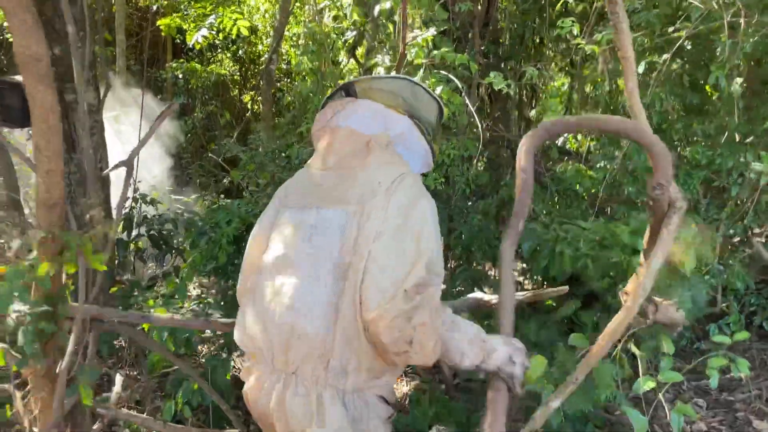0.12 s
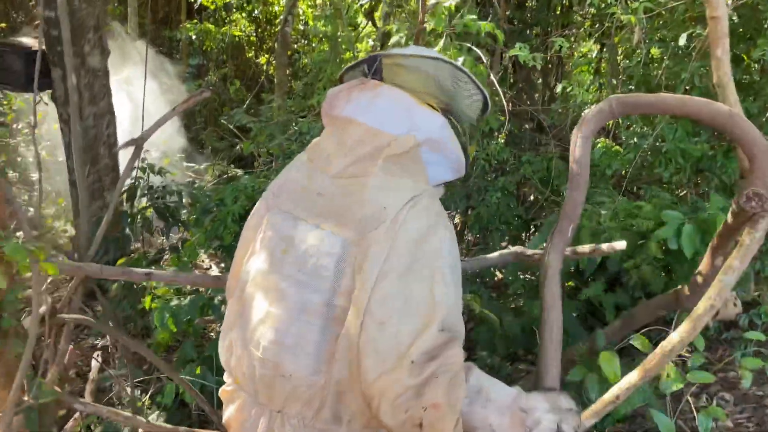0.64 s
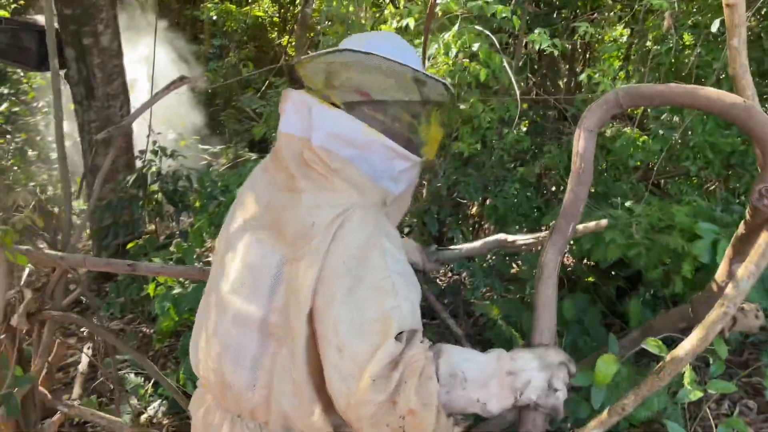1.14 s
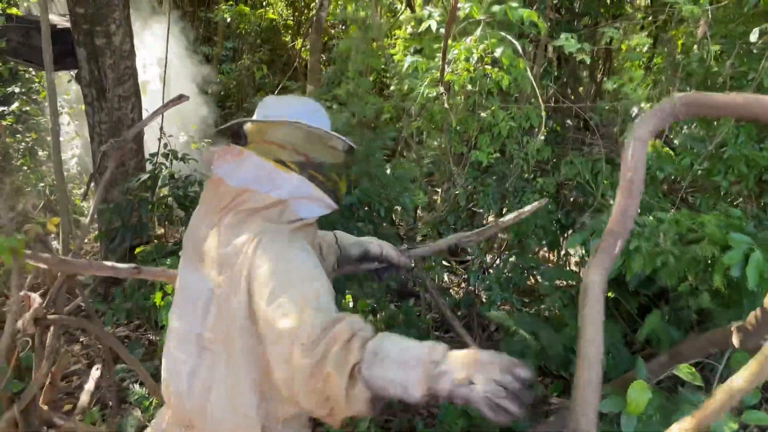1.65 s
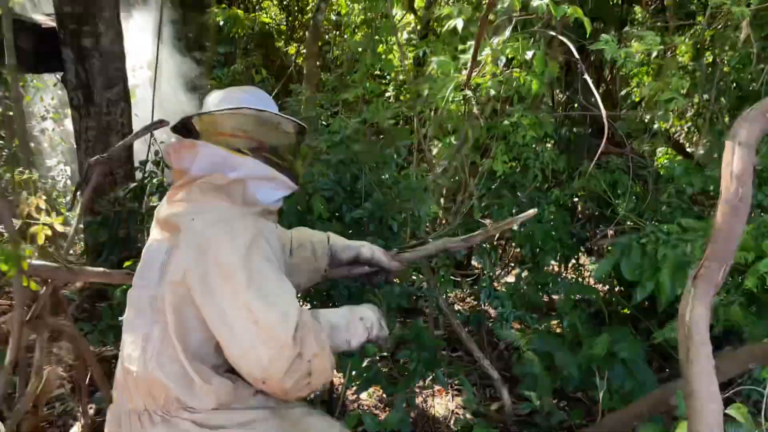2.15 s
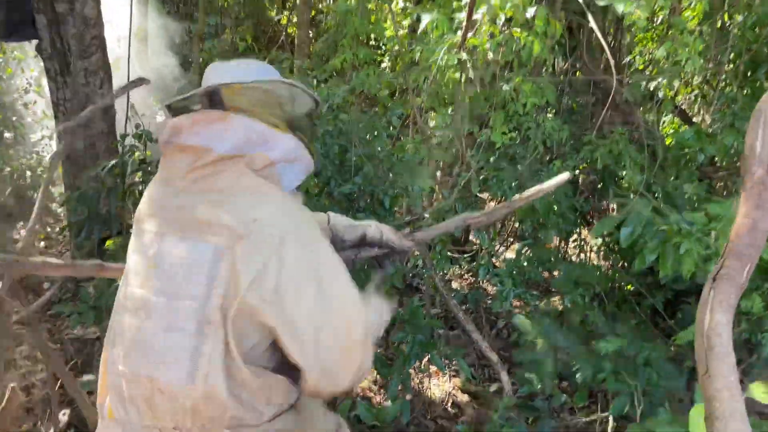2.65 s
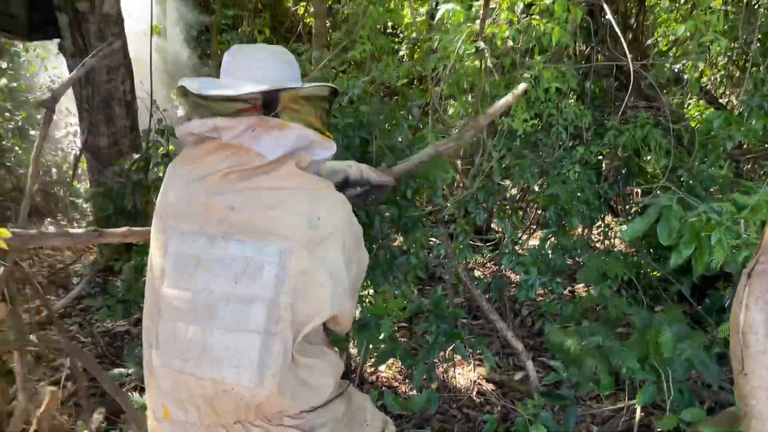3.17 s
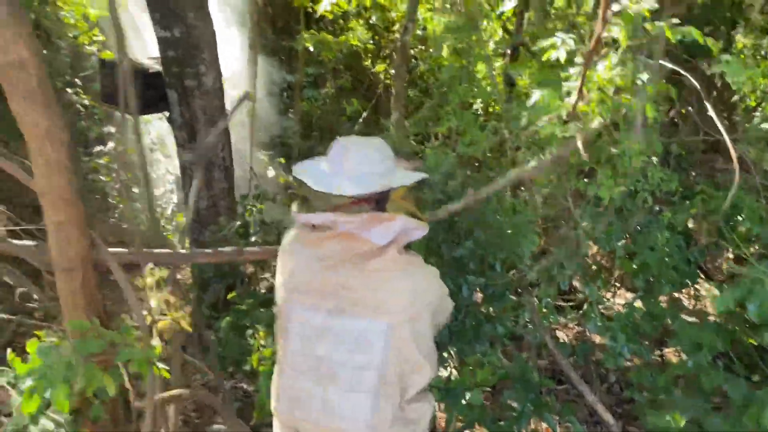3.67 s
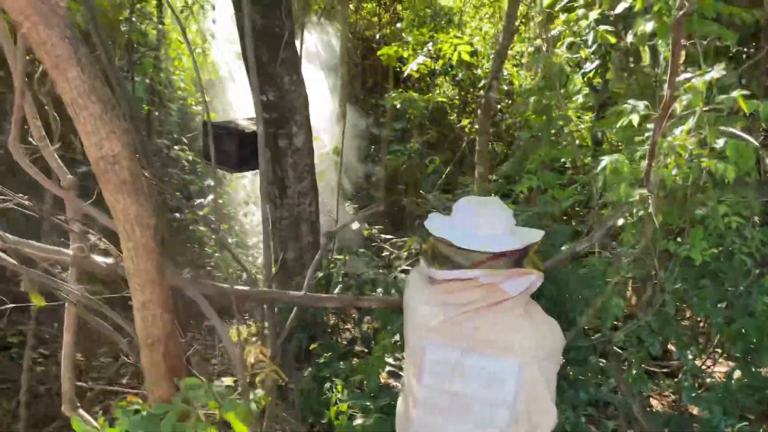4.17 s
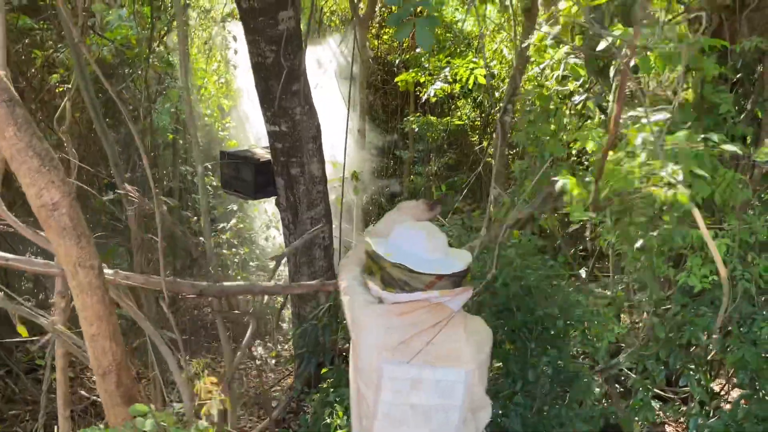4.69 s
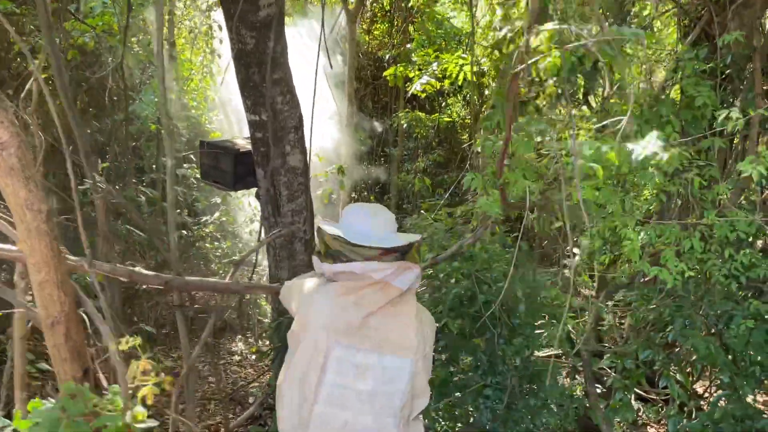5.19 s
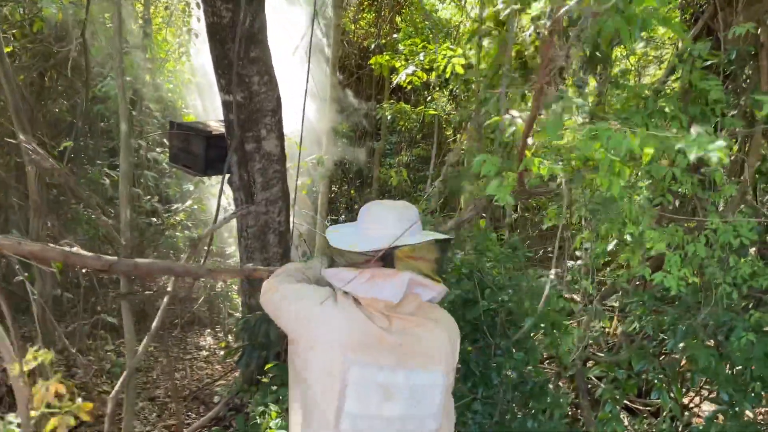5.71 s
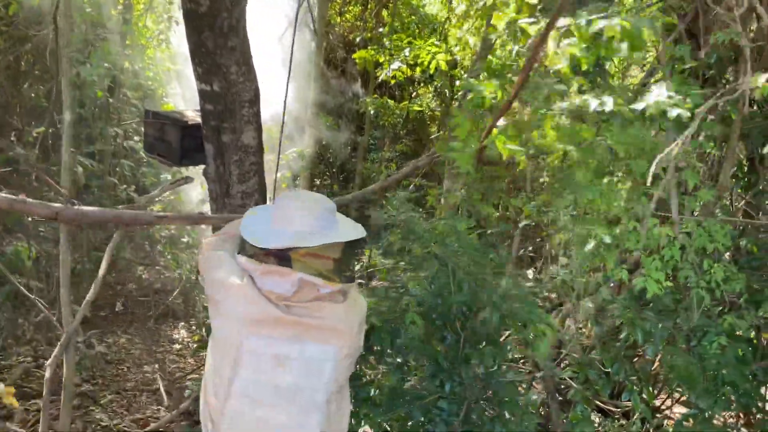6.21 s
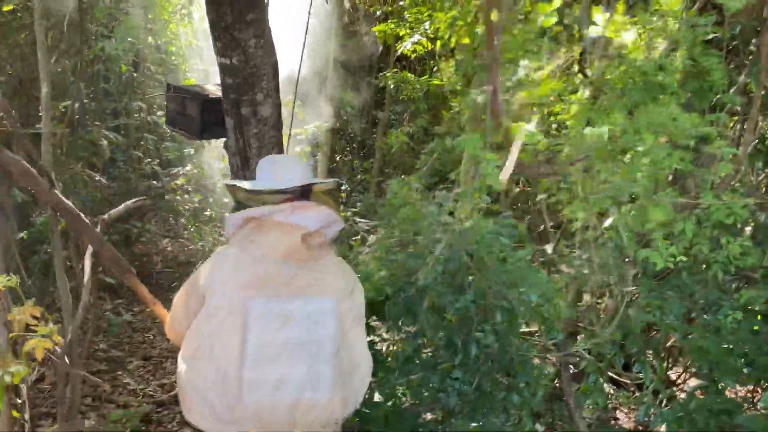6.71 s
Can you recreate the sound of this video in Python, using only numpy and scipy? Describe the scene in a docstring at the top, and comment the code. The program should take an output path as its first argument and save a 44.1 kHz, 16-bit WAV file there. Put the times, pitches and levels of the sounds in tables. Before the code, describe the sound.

Someone pushes through dry brush close by, leaves rustling in swells while twigs snap sharply and branches knock over a faint outdoor hush.

```python
"""Leaves rustle in clumps of tiny clicks as someone pushes through dry brush, close by and in stereo.
Each click excites a short ring of its own pitch, and the pushes swell and fade the rustle.
Twigs snap as bursts of cracks ringing a narrow band, branches knock in damped modes, and stems scrape as
dense catches in a broad band. Feet press the litter as low rustle. A faint hush and a low rumble,
both of filtered noise, lie below."""
import sys
import numpy as np
from scipy import signal
from scipy.fft import rfft, irfft, next_fast_len
from scipy.io import wavfile
from scipy.ndimage import uniform_filter1d

SR = 44100
rng = np.random.default_rng(int(sys.argv[2]) if len(sys.argv) > 2 else 0)


def volts_from_decibels(level):
    """Turn decibel levels (scalar or array-like) into linear amplitude factors."""
    exponent = np.asarray(level, float) / 20
    return 10 ** exponent


def generate_wav(signal):
    """Clip the signal to [-1, 1] and save it as 16-bit WAV at the path in sys.argv[1]."""
    frames = np.transpose(np.atleast_2d(signal))
    scaled = np.clip(frames, -1, 1) * 32767
    pcm = np.round(scaled).astype(np.int16)
    wavfile.write(sys.argv[1], SR, pcm)


N = 301682   # samples

# spectral colour of dry leaves and of the spray of a snap: frequency_hz, gain_db
LEAF_COLOUR = [(100, -4), (260, 0), (450, -5), (950, -1), (1600, 2), (2500, 1), (4200, 1.5), (5500, 0),
               (8000, -5), (9400, -3), (11000, -7), (13100, -14), (15600, -8)]


def rms_one(x):
    """Normalisation: scales a signal to unit root mean square."""
    return x / np.sqrt(np.mean(x ** 2) + 1e-20)


def coloured(x, points):
    """Linear filtering: gain by frequency, drawn through (hz, db) points on a log frequency axis."""
    size = next_fast_len(x.shape[-1])
    hz, db = np.transpose(points)
    log_hz = np.log(np.arange(size // 2 + 1) * SR / size + 1)
    gain = volts_from_decibels(np.interp(log_hz, np.log(hz), db))
    return irfft(rfft(x, size) * gain, size)[..., :x.shape[-1]]


def band(x, low, high, order=1):
    """Band-pass resonance: passes what lies between two frequencies in Hz."""
    sos = signal.butter(order, [low, min(high, .45 * SR)], "band", fs=SR, output="sos")
    return signal.sosfilt(sos, x)


def drift(rate_hz):
    """Low-passed noise: a slow random signal of unit rms, from two equal poles at rate_hz."""
    pole = np.exp(-80 * np.pi * rate_hz / SR)   # one step is 40 samples
    noise = rng.standard_normal(N // 40 + 2002)
    slow = signal.lfilter([1], [1, -2 * pole, pole * pole], noise)[2000:]
    return np.interp(np.arange(N) / 40, np.arange(len(slow)), rms_one(slow))


def ring(clicks, hz, t60_s):
    """Damped resonator: a unit click sets a sine ringing, which falls by 60 dB in t60_s."""
    radius, turn = 1000 ** (-1 / (t60_s * SR)), 2 * np.pi * hz / SR
    poles = [1, -2 * radius * np.cos(turn), radius * radius]
    return signal.lfilter([0, np.sin(turn)], poles, clicks + 1e-18)


def swells(start_s, peak_db, swell_s, fade_s):
    """Exponential growth and decay: one envelope a row about its peak, at every 64th sample."""
    since_s = np.arange(0, N + 64, 64)[None] / SR - np.reshape(start_s, (-1, 1))
    rise_s = np.maximum(np.reshape(swell_s, (-1, 1)), .005)
    fall_s = np.maximum(np.reshape(fade_s, (-1, 1)), .005)
    spans_s = np.where(since_s < 0, -rise_s, fall_s)
    return volts_from_decibels(peak_db)[:, None] * np.exp(-since_s / spans_s)


def every_sample(envelope):
    """Linear interpolation: an envelope at every 64th sample becomes one at every sample."""
    return np.interp(np.arange(N) / 64, np.arange(len(envelope)), envelope)


def hush():
    """Shaped noise: far air and a low rumble, independent in the two channels, wavering together."""
    # spectrum of air and rumble: frequency_hz, gain_db
    air_colour = [(25, -16), (42, -8), (62, 7), (110, -2), (260, -7), (900, -9), (1400, -11), (5400, -13),
                  (10000, -15), (13000, -21), (15600, -15)]
    level_db = -47 + 1.2 * drift(4)
    return volts_from_decibels(level_db) * rms_one(coloured(rng.standard_normal((2, N)), air_colour))


def strain():
    """Addition of power: overlapping pushes and steps give gains of leaves, branches, tread and driest leaves."""
    # pushes through the brush: peak_s, peak_db, swell_s, fade_s, branches_over_leaves_db
    push_rows = [(0.0, -35, .02, 0.11, -1.5), (0.2, -42.5, 0.24, 0.59, -3),
                 (0.56, -40.5, 0.22, 0.081, -3.5), (0.975, -48.5, 0.2, 0.032, 2.5),
                 (1.095, -51, 0.023, 0.3, -2.5), (1.467, -33.5, 0.058, 0.32, -6.5),
                 (1.79, -36.5, 0.027, 0.076, -0.5), (1.866, -36, 0.093, 0.34, -6.5),
                 (2.185, -39.5, 0.017, 0.073, -2), (2.345, -44, 0.019, 0.042, -14),
                 (2.424, -40, 0.029, 0.4, -4.5), (2.654, -37.5, 0.11, 0.15, -1),
                 (2.81, -38.5, .08, 0.046, -4), (2.883, -41.5, 0.03, 0.025, 6),
                 (2.978, -41.5, 0.035, 0.074, -7.5), (3.123, -40, .04, 0.11, -6),
                 (3.268, -37, 0.057, 0.077, -5), (3.45, -38.5, 0.18, 0.29, -5.5),
                 (3.73, -35.5, 0.061, 0.079, -8.5), (3.826, -33, 0.06, 0.13, -6.5),
                 (3.956, -32, 0.05, 0.21, -7.5), (4.36, -32, 0.094, .17, -7),
                 (4.681, -28.5, 0.078, 0.071, -8.5), (4.924, -39, 0.054, 0.12, -9.5),
                 (5.034, -34, 0.026, 0.15, -8.5), (5.318, -42.5, 0.0093, 0.16, -3),
                 (5.5, -46.5, 0.075, 1, -4), (5.852, -30, 0.05, 0.16, -7), (6.25, -39, 0.099, 0.067, -12),
                 (6.351, -28.5, 0.027, 0.056, -8), (6.42, -30.5, 0.06, 0.36, -9.5),
                 (6.839, -27.5, 0.028, .1, -5.5)]
    # feet pressing the litter: peak_s, peak_db
    step_rows = [(0.0, -50), (0.6, -52), (1.47, -46.5), (1.66, -44), (1.866, -46.5), (2.424, -44),
                 (2.654, -51), (2.883, -45), (3.123, -48), (3.312, -51), (3.826, -44), (3.956, -49),
                 (4.36, -54), (4.681, -50), (5.85, -52), (6.4, -59)]
    # driest leaves: time_s, level_over_leaves_db
    dry_share = [(0, -1), (.3, -4), (.65, -3.5), (1, -2), (1.4, -3), (1.67, 0), (1.95, -4), (2.35, -2),
                 (2.8, -1.5), (3.05, -5.5), (3.55, -0.5), (3.75, -7), (4.2, -0.5), (4.9, -2.5), (5.1, -2.5),
                 (5.35, -1.5), (5.75, -6.5), (5.83, 0), (6.1, 0), (6.7, -5), (6.84, 1)]
    step_swell_s, step_fade_s = 0.028, 0.093
    tread_over_branches_db = -9

    peak_s, peak_db, swell_s, fade_s, branch_db = np.transpose(push_rows)
    pushes = swells(peak_s, peak_db, swell_s, fade_s)
    leaves = np.sqrt(np.sum(pushes ** 2, axis=0))
    branches = np.sqrt(np.sum((pushes * volts_from_decibels(branch_db)[:, None]) ** 2, axis=0))
    steps = swells(*np.transpose(step_rows), step_swell_s, step_fade_s)
    low_branches = branches * volts_from_decibels(tread_over_branches_db)
    tread = np.sqrt(np.sum(steps ** 2, axis=0) + low_branches ** 2)
    gains = [every_sample(g) for g in (leaves, branches, tread, leaves)]
    gains[-1] = gains[-1] * volts_from_decibels(np.interp(np.arange(N) / SR, *np.transpose(dry_share)))
    return gains


def scrapes():
    """Stick-slip friction: a stem drags along bark, its dense uneven catches ringing in a broad band."""
    # drags: peak_s, peak_db, swell_s, fade_s, pitch_hz
    drag_rows = [(0.975, -46, 0.17, .02, 2380), (0.995, -37.5, 0.014, .006, 3250),
                 (3.96, -35.5, .05, 0.14, 1820), (4.66, -34.5, 0.051, 0.055, 1400),
                 (5.08, -36, 0.041, 0.068, 2500), (5.84, -41, .02, .08, 2000)]
    catches_per_s = 1900
    peak_s, peak_db, swell_s, fade_s, pitch_hz = np.transpose(drag_rows)
    caught = rng.random((2, N)) < catches_per_s / SR
    catches = caught * rng.standard_normal((2, N)) * volts_from_decibels(5.0 * drift(40.0))
    out = np.zeros((2, N))
    for envelope, hz in zip(swells(peak_s, peak_db, swell_s, fade_s), pitch_hz):
        stem = band(catches + 1e-18, hz / 1.23, hz * 1.25, order=2)
        out += every_sample(envelope) * rms_one(stem)
    return out


def small_twigs(leaves):
    """Random process: small breaks at chance moments, as rows for snaps(), their level following the rustle."""
    count, over_leaves_db, low_hz, high_hz = 24, 11.5, 2000, 5850
    thump_over_crack_db, pan_spread_db = -28, 4
    when, pitch, strength, side = rng.random((count, 4)).T
    leaves_db = 20 * np.log10(leaves[(when * N).astype(int)])
    peak_db = leaves_db + over_leaves_db + 6 * (strength - .5)
    hz = low_hz * (high_hz / low_hz) ** pitch
    pan_db = pan_spread_db * (2 * side - 1)
    return list(zip(when * N / SR, peak_db, hz, peak_db + thump_over_crack_db, pan_db))


def snaps(rows):
    """Impulsive excitation: parting fibres crack and ring the twig; the wood thumps and leaves shiver after."""
    # modes of the thumping wood: mode_hz, level_db, t60_s
    wood_modes = [(270, -12, .045), (720, -6, .025), (950, 0, .03), (1280, 0, .03)]
    size = 4000   # samples kept of each snap
    out = np.zeros((2, N + size))
    t = np.arange(size) / SR
    for start_s, peak_db, hz, thump_db, pan_db in rows:
        # weaker breaks die away sooner
        splinter_ms = max(4.43 + 0.07 * peak_db, .3)
        crack_noise, shiver_noise = rng.standard_normal((2, 2, size))
        fade = np.exp(-t / (splinter_ms / 1000)) * np.minimum(t / 0.00067, 1)
        # 900 breaks a second by chance, besides a certain one at the onset
        breaks = (rng.random(size) < 900 / SR) | (np.arange(size) == 20)
        cracks = (breaks * np.sign(crack_noise) + 0.18 * crack_noise) * fade

        # thin twigs crack wide and bright; thick wood mostly rings, dull and broad
        spray = np.clip(hz / 4000, 0, 1) * 0.75
        wide = 1.062 + 150 / hz
        ringing = band(cracks, hz / wide, hz * wide, order=2)
        crack = ringing + spray * coloured(band(cracks, 1500, 17000), LEAF_COLOUR)
        crack = crack / np.abs(crack).max(axis=1, keepdims=True) * volts_from_decibels(peak_db)

        thump = np.zeros((2, size))
        for mode_hz, mode_db, t60_s in wood_modes:
            thump += volts_from_decibels(mode_db + rng.normal(0, 3)) * ring(cracks, mode_hz, t60_s)
        thump = band(thump, 220, 1800, order=2)
        early_rms = np.sqrt(np.mean(thump[:, :400] ** 2, axis=1, keepdims=True))
        thump = thump / early_rms * volts_from_decibels(thump_db)

        shiver = band(shiver_noise, hz / 1.6, hz * 1.6) * np.minimum(t / .003, 1)
        shiver = shiver * volts_from_decibels(peak_db - 14) * np.exp(-t / .012)

        at = round(start_s * SR)
        out[:, at:at + size] += (crack + thump + shiver) * volts_from_decibels([[pan_db / 2], [-pan_db / 2]])
    return out[:, :N]


def slips(per_s, spread_db, die_s):
    """Sudden release: as a stem slips free the crackle jumps up at once and decays exponentially."""
    sizes = volts_from_decibels(spread_db * np.minimum(rng.exponential(1, N), 2.5))
    kicks = (rng.random(N) < per_s / SR) * sizes
    return 1 + signal.lfilter([1], [1, -np.exp(-1 / (die_s * SR))], kicks)


def rustle(gains):
    """Granular excitation: clicks ring at their own pitches; two unlike sprays follow the same slips."""
    # leaves, branches, tread, driest leaves: low_hz, high_hz
    layer_edges = [(1800, 7000), (500, 1800), (100, 500), (7000, 17000)]
    # mean grain rate of each layer in either channel: grains_per_s
    grain_rates = (9320, 1515, 599, 10100)
    jolts, out = slips(35, spread_db=2.0, die_s=0.005), np.zeros((2, N))
    jolt_powers = (0.45, 0.42, 0.72, 0.95)   # how strongly each layer follows the slips
    for (low, high), per_s, gain, jolt_power in zip(layer_edges, grain_rates, gains, jolt_powers):
        edges = np.geomspace(low, high, 10)
        born = rng.random((2, N)) < per_s / SR
        heights = volts_from_decibels(3.0 * np.minimum(rng.exponential(1, (2, N)), 5))
        grains = born * heights * rng.choice([-1, 1], (2, N))
        # each grain is dealt one of nine pitches, whose strengths drift apart
        dealt = rng.integers(0, 9, (2, N))
        layer = np.zeros((2, N))
        for k, hz in enumerate(np.sqrt(edges[1:] * edges[:-1])):
            clicks = grains * (dealt == k) * jolts ** jolt_power * volts_from_decibels(2.98 * drift(14.0))
            layer += band(clicks + 1e-18, hz / 1.075, hz * 1.075)
        out += rms_one(coloured(layer, LEAF_COLOUR)) * gain
    return out


def scene():
    """Superposition: all sources add, as two unlike views of the same brush."""
    # twigs snapping, branches knocking: start_s, crack_peak_db, ring_hz, thump_db, left_over_right_db
    snap_rows = [(0.024, -38, 1210, -31.5, -10), (0.316, -33, 2200, -54, -8), (0.362, -35, 288, -41.5, -2),
                 (0.505, -22, 2500, -62, 0), (0.538, -21, 2290, -39.5, -1), (0.553, -17.5, 1280, -48, -4),
                 (0.591, -11, 1170, -25.5, -5), (0.799, -29, 3300, -47.5, 4), (0.962, -26, 980, -49, -9),
                 (1.076, -28.5, 6170, -66, 4), (1.336, -27.5, 10600, -65, 2), (1.46, -17, 4240, -52, 9),
                 (1.636, -10.5, 3760, -52, 2), (1.66, -10, 4760, -55, 8), (1.684, -16.5, 5700, -48, 4),
                 (1.775, -0.5, 3740, -47, 3.5), (1.784, -6.5, 9000, -33.5, -1), (1.808, -19, 4040, -52, 7),
                 (1.853, -0.5, 4080, -25, 2), (1.979, -31, 2900, -47, -2), (2.164, -14.5, 3970, -34, 2),
                 (2.324, -15, 4120, -67, 6), (2.399, -28.5, 400, -45, 2), (2.411, -21, 2800, -47, -16),
                 (2.421, -18.5, 2780, -52, 3), (2.511, -28.5, 506, -53, 5), (2.546, -31, 410, -54, -1),
                 (2.604, -30, 890, -27.5, -11), (2.646, -24, 1130, -40, 4), (2.658, -28, 278, -33, -5),
                 (2.725, -24, 935, -48, 1.5), (2.789, -21, 890, -43, 3), (2.832, -28, 931, -46, -4),
                 (2.875, -24, 885, -41, 6), (2.883, -16, 1570, -35, 2), (3.112, -15.5, 3970, -37.5, -0.5),
                 (3.248, -19, 4100, -58, 3), (3.262, -18.5, 4850, -55, -12), (3.338, -20, 4600, -45, 3),
                 (3.387, -23, 2100, -47, -3), (3.462, -21.5, 3760, -47, 3), (3.536, -15, 4000, -49, 2),
                 (3.73, -16.5, 4640, -43, -2), (3.775, -13.5, 2440, -37.5, -2), (3.841, -18, 4030, -37, 2),
                 (3.949, -22, 1860, -35, -6), (4.193, -21, 4500, -61, 4), (4.242, -17.5, 3280, -60, -4),
                 (4.296, -19, 1400, -57, -11), (4.339, -17, 3980, -52, -6), (4.431, -20, 4450, -53, 7),
                 (4.546, -18, 4570, -57, -5), (4.632, -19, 2660, -41, -9), (4.671, -3.5, 5860, -41, -3.5),
                 (4.795, -19, 5260, -56, 0), (4.847, -25, 10200, -58, 6), (4.902, -27, 1090, -41, -10),
                 (5.012, -10, 4600, -46, 3), (5.074, -19, 2570, -42, 2), (5.126, -17, 2320, -42, -3),
                 (5.293, -21, 4730, -50, -1), (5.326, -19, 5040, -58, -1), (5.468, -21.5, 3180, -56, -6),
                 (5.816, -13.5, 9900, -48, -1.5), (5.83, -6, 4330, -33.5, -5), (5.873, -9.5, 5170, -49, 3),
                 (6.16, -16, 5940, -37, -0.5), (6.267, -18, 4360, -56, 2), (6.278, -20, 4500, -51, -2),
                 (6.313, -14, 3520, -36, -2), (6.33, -9, 3290, -48, 3), (6.341, -7, 4510, -48, -8),
                 (6.347, -8.5, 3440, -45, 5), (6.36, -4, 4700, -43, -3), (6.389, -14, 6500, -47, 4),
                 (6.448, -17, 4830, -50, 2), (6.479, -16, 2900, -47, -4), (6.583, -24, 4900, -47, -9),
                 (6.801, -20, 3780, -46, 1)]
    gains = strain()
    twigs = snaps(snap_rows + small_twigs(gains[0]))
    return hush() + scrapes() + twigs + rustle(gains)


def low_pass(x):
    """Removes everything above the highest recorded frequency."""
    return signal.sosfilt(signal.butter(12, 16990, fs=SR, output="sos"), x)


def record(dry):
    """Partial coherence: the right channel carries part of the left's sound, shifted in phase, and part its own."""
    # stereo pair; above 11 kHz both sides carry one signal, in step, then opposed:
    # frequency_hz, likeness (0 to 1), left_lead_rad, left_over_right_db
    pair_rows = [(100, .87, 0, -.5), (400, .85, 0, -1.5), (750, .75, 1.1, -1), (1250, .75, 1.5, -2),
                 (1800, .35, 3.2, -2.5), (2800, .3, 2.2, 1), (3700, .25, 5.2, 1), (5400, .3, 9.4, 4),
                 (6500, .45, 11.9, 2), (7800, .35, 9.6, 1), (9000, .6, 9.3, -3), (10200, .5, 7.2, -2.5),
                 (11100, 1, 2 * np.pi, 0), (13200, 1, 2 * np.pi, 0), (13500, 1, np.pi, 0)]
    size = next_fast_len(N + 2000)
    hz, *columns = np.transpose(pair_rows)
    bins_hz = np.arange(size // 2 + 1) * SR / size
    alike, lead_rad, balance_db = (np.interp(bins_hz, hz, c) for c in columns)
    alike = np.clip(alike, 0, 1)
    left, own = rfft(dry, size)
    right = alike * np.exp(-1j * lead_rad) * left + np.sqrt(1 - alike ** 2) * own
    balanced = np.array([left * volts_from_decibels(balance_db / 2), right * volts_from_decibels(-balance_db / 2)])
    pair = irfft(balanced, size)[:, :N]

    # around sudden treble attacks each side carries its own signal above 11 kHz
    is_top = bins_hz > 11000
    top = irfft(left * is_top, size)[:N]
    attack = uniform_filter1d(top ** 2, 90) > 5.5 * uniform_filter1d(top ** 2, 1800)
    unshared = np.minimum(uniform_filter1d(1. * attack, 700) * 40, 1)
    pair[1] += unshared * irfft((own - right) * is_top, size)[:N]

    # steep low-pass, 60 dB down from 16200 Hz, then a gentle high-pass at 42 Hz
    pair = signal.sosfilt(signal.cheby2(12, 60, 16200, fs=SR, output="sos"), pair)
    pair = signal.sosfilt(signal.butter(2, 42, "high", fs=SR, output="sos"), pair)
    return low_pass(pair)


dry = scene()
out = record(dry)
generate_wav(out)
```